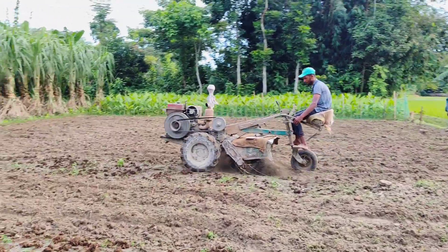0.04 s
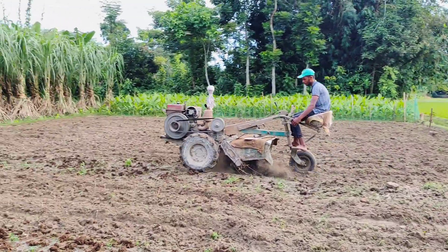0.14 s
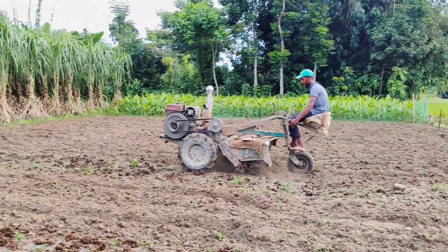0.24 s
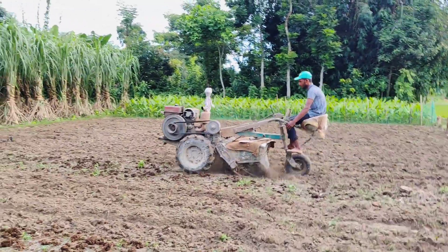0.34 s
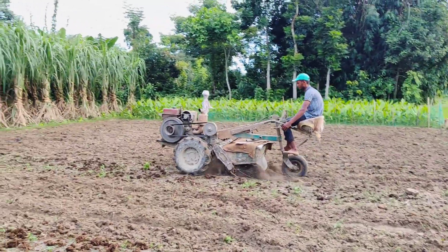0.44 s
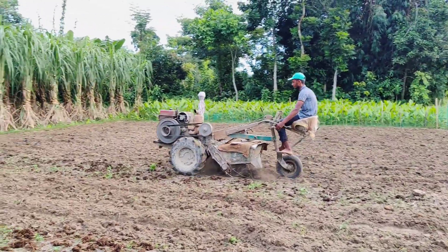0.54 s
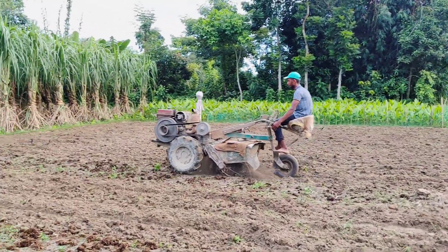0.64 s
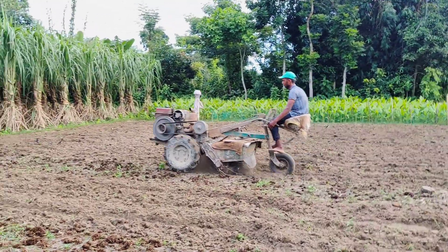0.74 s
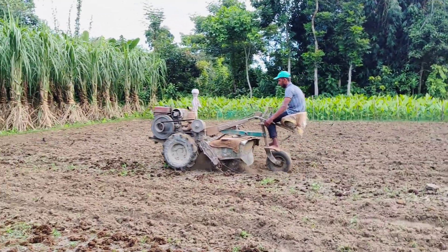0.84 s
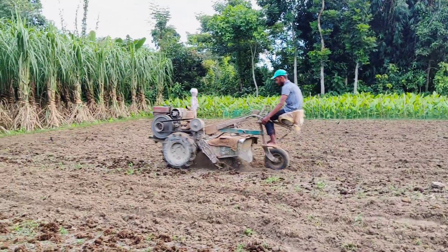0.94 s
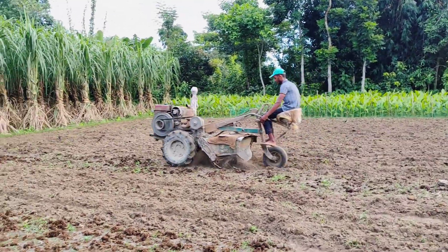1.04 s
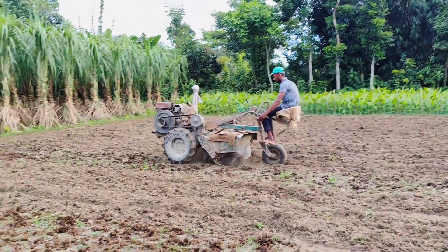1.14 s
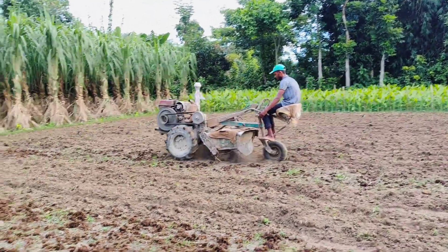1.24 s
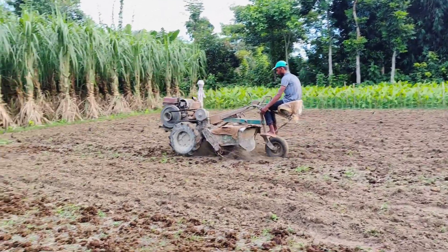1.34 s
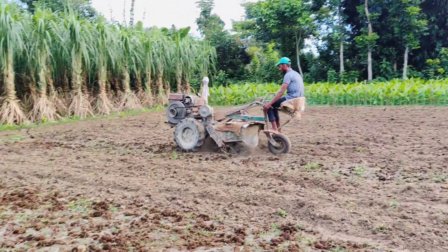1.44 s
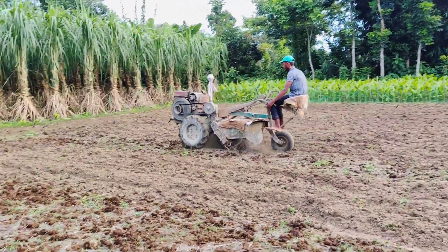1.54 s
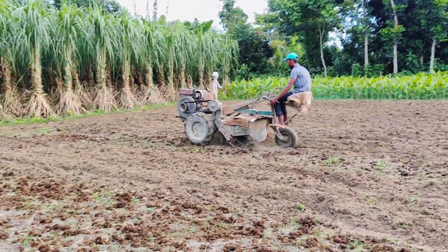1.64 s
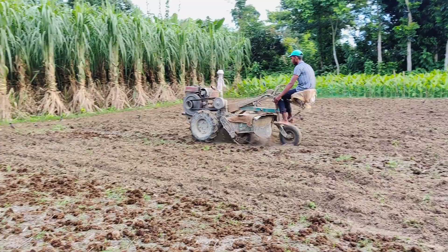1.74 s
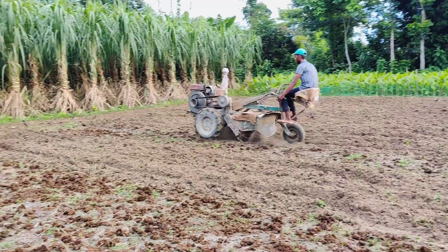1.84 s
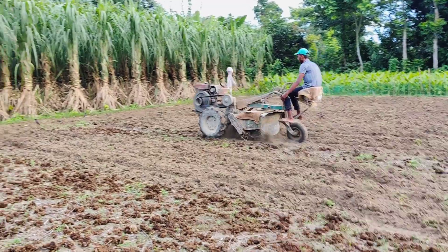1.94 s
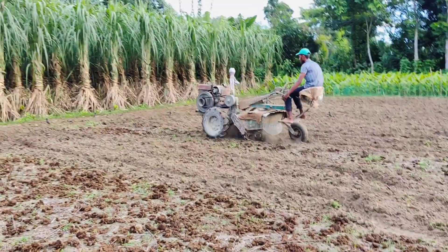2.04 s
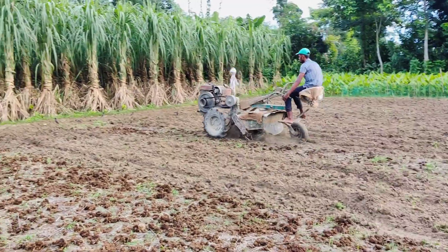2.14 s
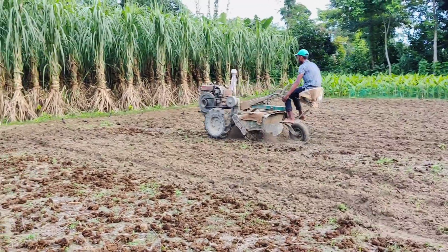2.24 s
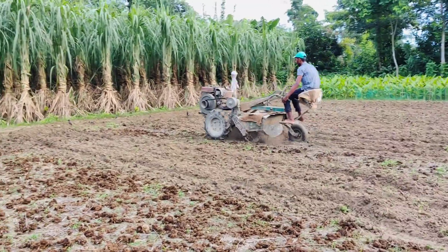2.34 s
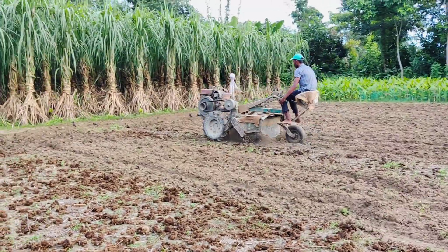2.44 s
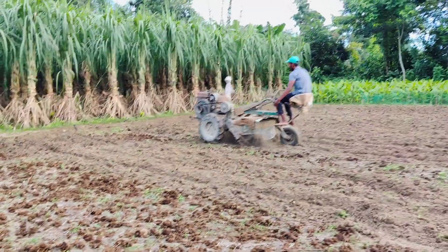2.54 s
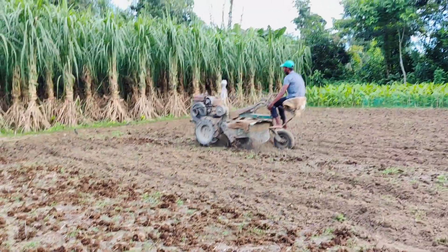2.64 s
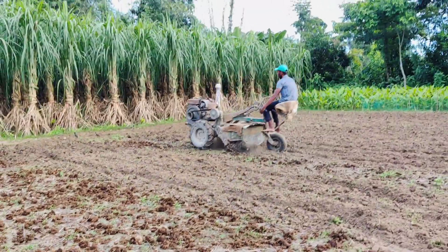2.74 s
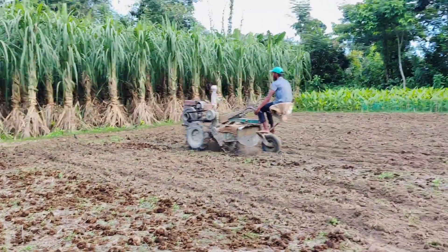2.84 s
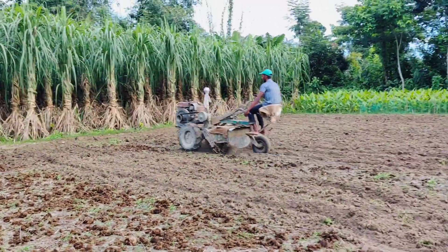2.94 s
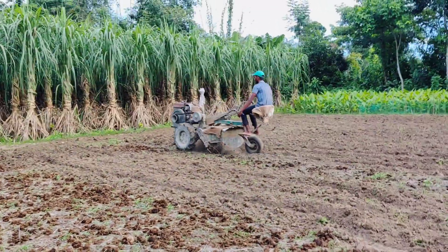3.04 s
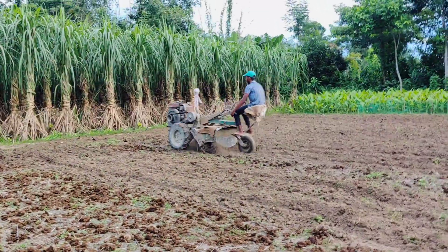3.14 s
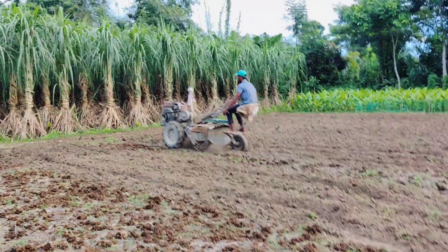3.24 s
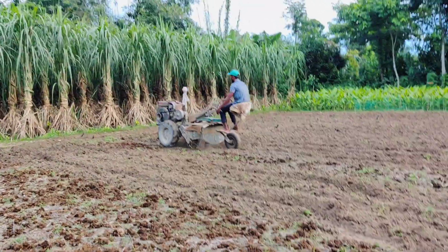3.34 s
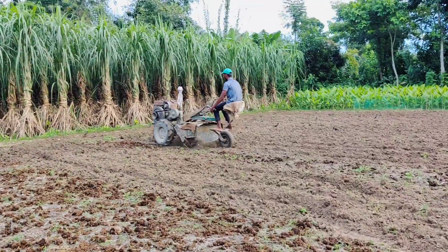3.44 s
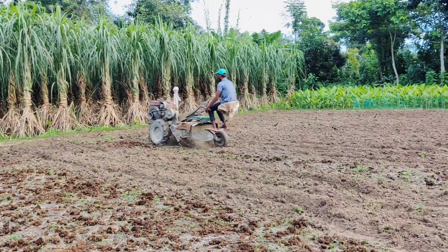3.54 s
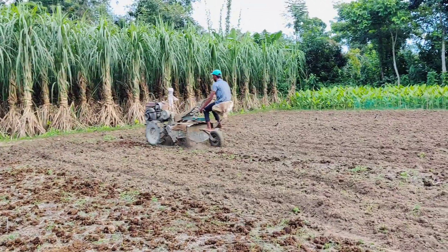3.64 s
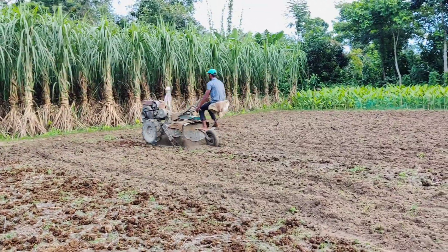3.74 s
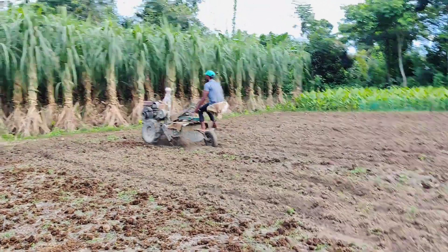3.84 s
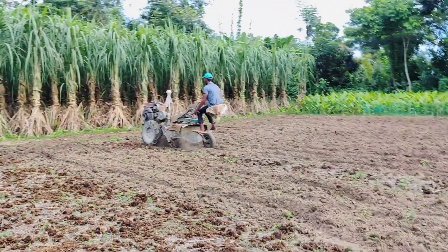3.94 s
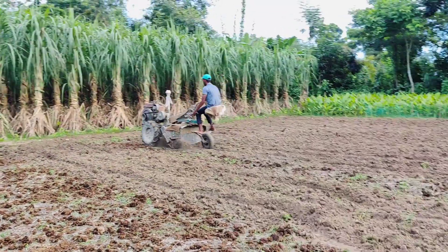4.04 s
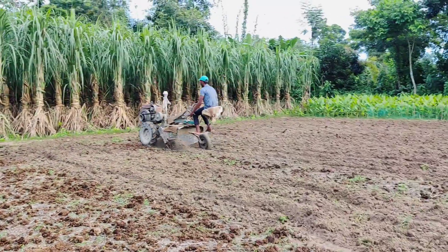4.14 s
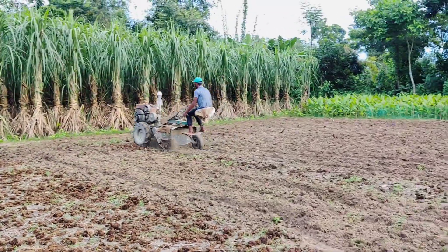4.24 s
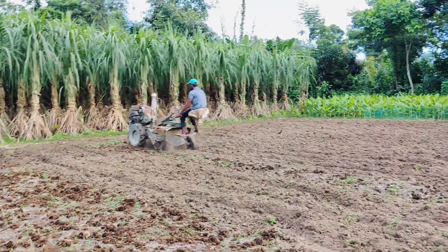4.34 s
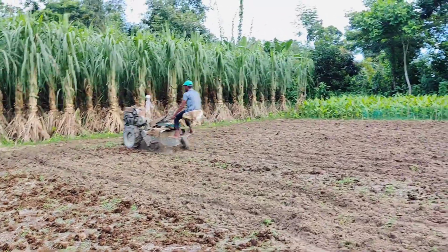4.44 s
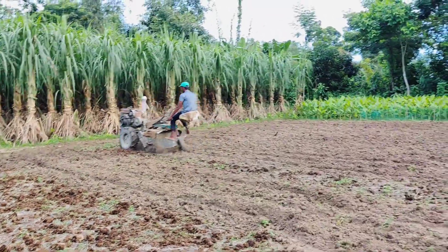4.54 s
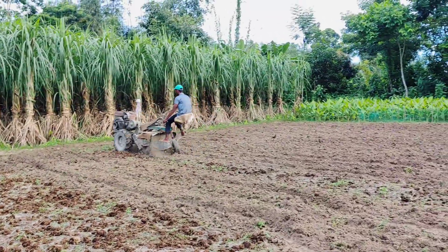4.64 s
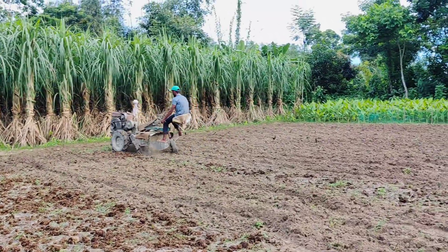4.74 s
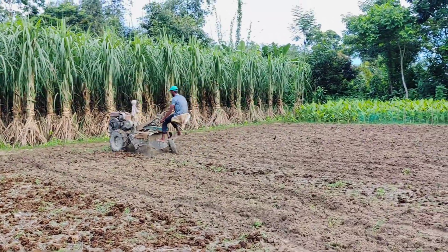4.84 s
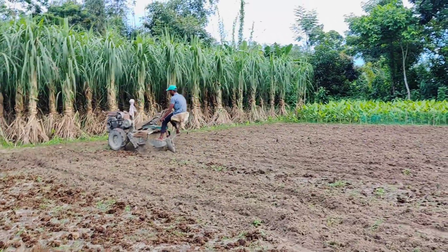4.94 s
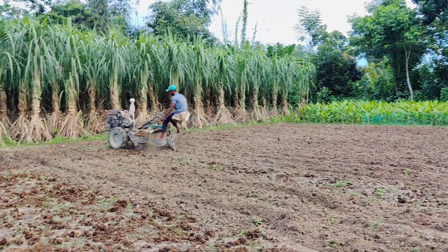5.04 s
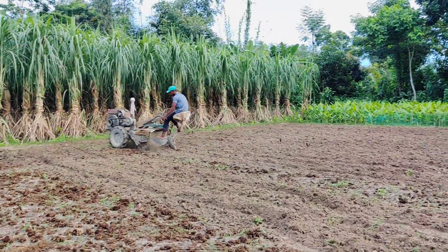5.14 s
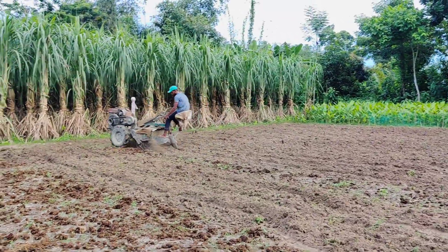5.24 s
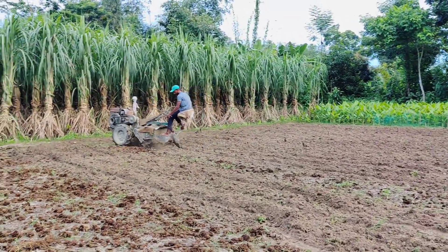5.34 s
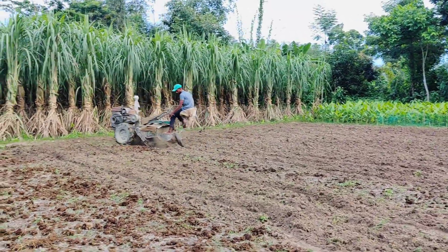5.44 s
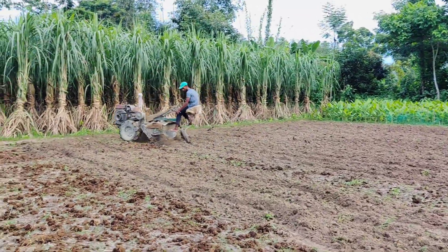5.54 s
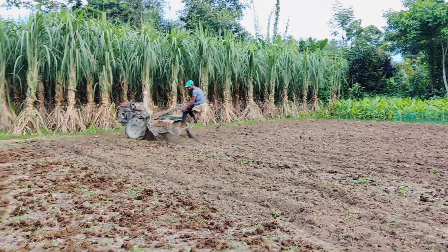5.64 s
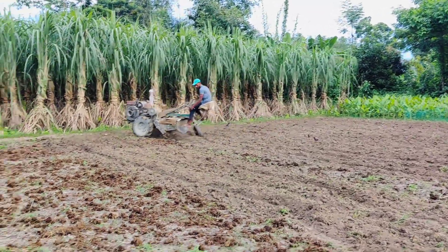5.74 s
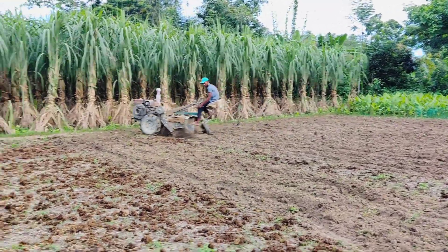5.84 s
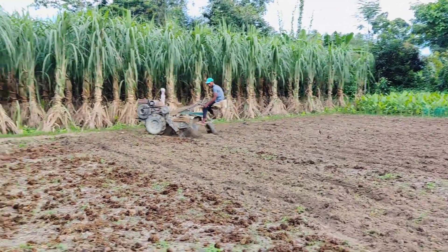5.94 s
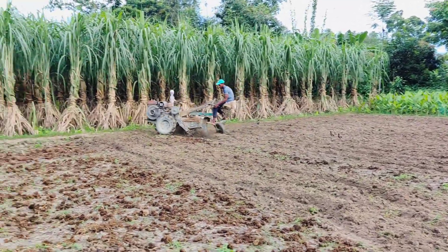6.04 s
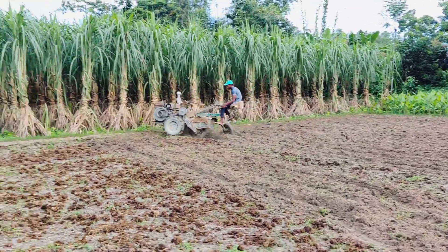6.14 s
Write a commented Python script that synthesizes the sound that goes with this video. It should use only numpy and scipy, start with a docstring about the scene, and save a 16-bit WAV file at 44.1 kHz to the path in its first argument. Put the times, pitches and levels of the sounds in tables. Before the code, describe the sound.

From the first instant a single-cylinder diesel walking tractor is already running under load about seven metres away, outdoors, heard by a handheld stereo microphone. Deep, blunt exhaust thumps come about twelve a second, each with a short gassy rush, low rumble and a cluster of metallic knocks, valve thuds and ticks. Over them runs a dense, rough rattle of gears, chain, loose panels and tiller tines, with a faint gear hum. The clatter is brightest and closest until about 1.5 s, then fades unevenly, its treble thinning as the machine draws away. Firings vary slightly in strength. Harder clanks poke out near 0.6 s, more often from 2.4 to 4.3 s, and again around 5.2 s. The engine sags a little until about 5 s, then recovers slightly before the end at 6.2 s, still running and roughly twice as far away. Close reflections shift the tone gently; there is no reverberant tail.

```python
"""A single-cylinder diesel walking tractor starts 7 m from the microphones, pulling a rotary tiller over a field.
Each four-stroke cycle gives an exhaust thump of ringing gas puffs, an intake gulp and a round of metal knocks
over gear, chain and tine rattle. As it slowly draws away the engine sags under the tines, with odd firings and
harder knocks on the way, then picks up a little at the end. The hand-held pair of microphones also hears
delayed bounces off its holder and scatter from the field."""
import sys
import numpy as np
from scipy import signal
from scipy.fft import rfft, irfft
from scipy.io import wavfile
from scipy.ndimage import uniform_filter1d, map_coordinates

SR = 44100
rng = np.random.default_rng(int(sys.argv[2]) if len(sys.argv) > 2 else 0)


def to_wav(sig):
    """Store sig (one row per channel, or 1-D mono) as 16-bit WAV at the path in sys.argv[1].

    Samples outside -1..1 are clipped; the rate is SR.
    """
    pcm = np.clip(np.atleast_2d(sig), -1, 1) * 32767
    pcm = np.round(pcm).astype(np.int16)
    wavfile.write(sys.argv[1], SR, pcm.T)  # frames by channels


N = 272979
T = np.arange(N) / SR  # [s]
FREQ = np.maximum(np.arange(N + 1) * SR / (2 * N), 1e-3)  # [Hz], for a spectrum of twice the length
START_M, AWAY_M_S = 6.96, 1.24  # distance of the tractor at first [m], and how fast it draws away [m/s]


def undb(db):
    """Decibels to gain."""
    return 10 ** (np.asarray(db) / 20)


def unit(x):
    """Scale to rms 1."""
    return x / np.sqrt(np.mean(x ** 2))


def curves(rows, at=T):
    """Join the rows of a table by straight lines over time, one curve a column."""
    s, *columns = np.transpose(rows)
    return [np.interp(at, s, column) for column in columns]


def filtered(x, response):
    """Pass a sound through a frequency response, zero-padded so that its tail does not wrap round."""
    return irfft(rfft(x, 2 * N) * response)[..., :N]


def resonance(hz, width_hz):
    """Response of one damped resonance, gain 1 at its centre."""
    return 1j * FREQ * width_hz / (hz ** 2 - FREQ ** 2 + 1j * FREQ * width_hz)


def colour(points):
    """Response through (Hz, dB) points, straight over log frequency."""
    hz, db = np.transpose(points)
    return undb(np.interp(np.log(FREQ), np.log(hz), db))


def below(hz, order):
    """Smooth low-pass response without phase shift."""
    return 1 / np.sqrt(1 + (FREQ / hz) ** (2 * order))


def delayed(x, ms):
    """Read a sound through a delay that may move, as a sound path that changes length."""
    return map_coordinates(x, [np.arange(N) - ms * SR / 1000], order=3)


def cycle_clock(turns, at_ms):
    """Index of the nearest engine cycle, and ms since a given point in it, taking the mean cycle length."""
    period_ms = 1000 * T[-1] / (turns[-1] - turns[0])
    place = turns - at_ms / period_ms
    nearest = np.round(place)
    return nearest.astype(int) + 2, (place - nearest) * period_ms  # + 2 keeps the index positive


def exhaust(turns, scatter_db=-0.2, rush_db=-18, rumble_db=-21.5, sub_db=-21.5, drone_db=-22, shake_ms=16):
    """Puffs of gas, no two alike, ring the silencer; turbulence follows each and the frame rumbles and drones."""
    # gas strokes of a cycle: (after the exhaust opens [ms], half length [ms], relative flow [out +, in -])
    strokes = [(.13, 1.21, 0.17), (21.15, 1.51, -0.084), (43.64, 1.83, 0.094), (73.04, 1.75, 0.067)]
    # firings for which the governor gives more or less fuel: (time [s], level change [dB])
    odd_firings = [(0.1, -0.9), (0.76, -1.2), (1.09, 1.8), (1.43, 1.3), (2.34, 1.3), (2.93, 1.9),
                   (3.1, 1.2), (3.68, -2.1), (4.79, 1.5), (4.96, -1.2), (5.48, -1.3), (5.73, -0.9),
                   (5.9, 1.5)]
    # silencer and air-box resonances: (centre [Hz], width [Hz], relative level [dB])
    pipe = [(56.9, 5.8, 3.5), (91.8, 18.2, -2), (108.2, 1.9, -18), (126.8, 4.8, 3), (221, 150, -5),
            (217.1, 4.3, -8.5), (252.4, 6.2, -1.5)]
    flow = 0
    for at_ms, half_ms, size in strokes:
        cycle, ms = cycle_clock(turns, at_ms)
        strength, length = rng.standard_normal((cycle.max() + 1, 2)).T
        cycle_half_ms = half_ms * (1 + 0.05 * length[cycle])
        puff = np.exp(-.5 * (ms / cycle_half_ms) ** 2)
        fuel_db = sum(db * (cycle == cycle[np.searchsorted(T, s)]) for s, db in odd_firings)
        flow = flow + size * undb(fuel_db + scatter_db * strength[cycle]) * puff
    silencer = sum(undb(db) * resonance(hz, width_hz) for hz, width_hz, db in pipe)
    thump = unit(filtered(flow, silencer * below(370, order=6)))

    _, ms = cycle_clock(turns, at_ms=5.2)
    turbulence = rng.standard_normal(N) * np.exp(-.5 * (ms / 3.8) ** 2)
    rush = filtered(turbulence, resonance(202.0, 91) * below(216, order=6))
    shake = np.exp(-.5 * (ms / shake_ms) ** 2)  # the frame shakes most just after a firing
    rumble = filtered(shake * rng.standard_normal(N), resonance(83, 47) * below(240, order=4))
    drone = filtered(rng.standard_normal(N), resonance(267.5, 28) ** 2)
    sub = filtered(shake * rng.standard_normal(N), resonance(42, 52) * below(200, order=4))
    frame = undb(rumble_db) * unit(rumble) + undb(drone_db) * unit(drone) + undb(sub_db) * unit(sub)
    return thump + undb(rush_db) * unit(rush) + frame


def distance():
    """Metres to the tractor, which draws away at a steady walking pace."""
    return START_M + AWAY_M_S * T


def machinery(turns, scatter_db=2.0, gears_db=-4, ticks_db=-10, rise_ms=1, slack_ms=0.38, ring_db=-6,
              cam_db=-17, contact_hz=7400):
    """Knocks timed by the crank, a few harder ones, and churning gears and tines all ring the same metal."""
    # in order: combustion knock, exhaust blast, exhaust valve seating (thud, then tick), intake valve thud,
    # piston slap, intake valve tick: (after the exhaust opens [ms], decay [ms], relative level [dB],
    # centre [Hz], width [Hz], clean strike over its rattle [dB])
    knocks = [(64.5, 6.8, -3.5, 2060, 3600, -16.5), (-3, 14.8, -3.5, 5200, 14200, -21),
              (21, 3.9, 1, 510, 320, 1), (23, 5.5, -1, 9200, 3000, -18), (48, 3.9, -8, 820, 750, 2.5),
              (66.5, 4.8, -8, 710, 260, -1), (47.5, 4.5, -3.5, 3700, 3500, -13)]
    # knocks harder than the rest: (time [s], decay [ms], relative level [dB], centre [Hz], width [Hz])
    hard_knocks = [(0.603, 2.7, 0.5, 1180, 1200), (1.881, 3, 2.5, 5730, 1790), (2.411, 3.5, -1, 1900, 1405),
                   (2.585, 3.5, 5, 1500, 800), (2.84, 4.4, 0.5, 775, 400), (3.262, 2.5, 2, 1300, 800),
                   (3.501, 3.7, 5, 900, 1200), (3.751, 3.3, 3, 2700, 1500), (3.842, 3.5, 5, 1510, 800),
                   (4.095, 2, 1, 2670, 1500), (4.276, 9.1, 0, 1373, 298), (5.156, 3, 5, 5900, 2600),
                   (5.203, 3.1, 1.5, 1240, 900), (5.611, 3.5, -2, 760, 400), (5.9, 3.5, 0.5, 1410, 800)]
    # ring of the engine block, gearbox and tiller hood: (frequency [Hz], relative gain [dB])
    metal = [(150, -11.5), (300, -2.5), (450.0, -10), (520.0, -8.5), (570.0, -7), (640.0, -4.5),
             (720.0, -1.15), (820.0, -1.5), (920.0, -0.7), (1020.0, -2.8), (1130.0, -0.5), (1250.0, 3),
             (1400.0, 3.5), (1580.0, 0.5), (1800.0, 1.8), (2050.0, 1.2), (2300.0, -0.4), (2600.0, -3.5),
             (2900.0, -7.5), (3300.0, -12), (3900.0, -12.5), (4600.0, -13), (5300.0, -14), (5800.0, -13.5),
             (6400.0, -12), (7000.0, -22.5), (7500, -32.5), (8900, -35), (9900, -34.5), (15000, -42)]
    chain = filtered(chain_ticks(), resonance(2700, 6800))
    drive = undb(gears_db) * rattle() + undb(ticks_db) * chain
    for at_ms, decay_ms, db, hz, width_hz, strike_db in knocks:
        cycle, ms = cycle_clock(turns, at_ms)
        strength, early = rng.standard_normal((cycle.max() + 1, 2)).T
        age_ms = np.maximum(ms + slack_ms * early[cycle], 0)
        force = undb(db + scatter_db * np.tanh(strength[cycle]))
        chatter = (1 - np.exp(-age_ms / rise_ms)) * np.exp(-age_ms / decay_ms)
        contact = np.diff(np.sign(age_ms), prepend=1) > 0  # the instant of each strike
        blow = chatter * rattle()
        blow[0] += undb(strike_db) * chatter.std() * unit(contact)
        drive = drive + 2 * filtered(force * blow, resonance(hz, width_hz) * below(contact_hz, order=4))
    cam = filtered(cam_ticks(turns), resonance(1400, 3000) * below(contact_hz, order=4))
    drive[0] += undb(cam_db) * unit(cam)
    crack = rattle()
    for s, decay_ms, db, hz, width_hz in hard_knocks:
        age_ms = 1000 * np.abs(T - s)
        burst = (T > s) * np.exp(-age_ms / decay_ms)
        ring = undb(ring_db) * np.sin(2 * np.pi * hz * (T - s))
        drive = drive + undb(db) * filtered(burst * (crack + ring), resonance(hz, width_hz))
    small_guards = loose_panels(drive, patchy_db=0.98, size=512)
    large_panels = loose_panels(small_guards, patchy_db=1.4, size=2048)
    return filtered(large_panels, colour(metal))


def rattle(grain_db=2.5):
    """Dense small impacts of unequal size, as sent three ways: towards the listener, and out to either side."""
    return unit(rng.standard_normal((3, N)) * undb(grain_db * rng.standard_normal(N)))


def cam_ticks(turns, count=17, uneven_db=4, scatter_db=1.5):
    """Worn timing gears tick at the same uneven places in every cycle."""
    places, wear = rng.random((count, 2)).T
    cycles = np.arange(np.ceil(turns[-1]))
    at = np.searchsorted(turns, cycles[:, None] + places)
    sizes = undb(uneven_db * (2 * wear - 1) + scatter_db * rng.standard_normal(at.shape))
    ticks = np.bincount(at.ravel(), sizes.ravel(), N + 1)[:N]
    return unit(ticks - ticks.mean())


def chain_ticks(per_s=350, spread_db=2.5):
    """Separate sharp ticks of chain links and of grit on the tines, at random instants."""
    falls = rng.random(N) < per_s / SR
    signs = rng.choice([-1, 1], (3, N))
    sizes = undb(spread_db * np.tanh(rng.standard_normal((3, N))))
    return unit(falls * signs * sizes)


def loose_panels(sound, patchy_db=1.5, size=512):
    """Loose panels and guards rattle at their own pitches: brief patches of the spectrum swell and dip."""
    spectra = signal.stft(sound, nperseg=size)[2]
    patches = rng.standard_normal(spectra.shape[1:])  # pitch by time, shared by the three ways
    patches = uniform_filter1d(patches, size=3, axis=0)
    patches = uniform_filter1d(patches, size=9, axis=1)
    return signal.istft(spectra * undb(patchy_db * unit(patches)), nperseg=size)[1][:, :N]


def moving_off(ports, sway_db=0.71, hood_hz=1150, block_hz=2830):
    """Hood, block and chain fade as the tractor leaves and the holder shades each port; the sizzle wavers."""
    # bottom of the clatter, mostly the tiller hood: (time [s], left level [dB], right level [dB])
    hood_levels = [(0.0, -24, -23), (0.35, -25.5, -25), (0.7, -24.5, -24.5), (1.2, -27.5, -26.5),
                   (1.6, -27, -25.5), (2.1, -28.5, -26.5), (2.5, -28.5, -29), (2.9, -30.5, -27),
                   (3.35, -29, -28.5), (3.95, -31, -30), (4.3, -33, -30), (4.7, -32.0, -27.5),
                   (5.1, -31, -34.5), (5.5, -33.5, -31), (5.85, -33.5, -32.2), (6.19, -32, -33)]
    # middle of the clatter, mostly the engine block: (time [s], left level [dB], right level [dB])
    block_levels = [(0.0, -30.1, -27.6), (0.35, -28.5, -26.5), (0.699, -29.6, -24), (1.2, -29, -25),
                    (1.6, -31.3, -26.5), (2.1, -30.4, -26.5), (2.5, -30.5, -27.9), (2.9, -32, -27.5),
                    (3.35, -31.5, -28), (3.95, -36.5, -32), (4.3, -35.5, -27.5), (4.7, -32, -26),
                    (5.1, -34, -34), (5.5, -34.5, -31), (5.85, -35.5, -31), (6.19, -32.5, -28.5)]
    # treble of the clatter, mostly chain and tines: (time [s], left level [dB], right level [dB])
    sizzle_levels = [(0.0, -28.5, -29.5), (0.35, -27.5, -27.0), (0.7, -28.5, -27.5), (1.2, -27.5, -25.3),
                     (1.6, -27.5, -28), (2.1, -30, -31), (2.5, -31.5, -33), (2.9, -33.5, -32.5),
                     (3.35, -31.5, -32), (3.95, -32, -33), (4.3, -34.5, -32.0), (4.7, -33.5, -35.5),
                     (5.1, -33, -33), (5.5, -34.5, -33.7), (5.85, -34.5, -33.5), (6.19, -31.5, -32.3)]
    hood = filtered(ports, below(hood_hz, order=8) ** 2)
    body = filtered(ports, below(block_hz, order=8) ** 2)
    block = body - hood
    sizzle = (ports - body) * undb(sway_db * wander(27.93))
    parts = (hood, hood_levels), (block, block_levels), (sizzle, sizzle_levels)
    return sum(undb(curves(levels)) * part / part.std(axis=1, keepdims=True) for part, levels in parts)


def wander(rate):
    """Smooth random drift from about `rate` fresh values a second; spread near 1."""
    size = int(SR / rate)
    steps = np.repeat(rng.standard_normal(N // size + 1), size)
    smooth = uniform_filter1d(uniform_filter1d(steps, size), size)
    return 1.3 * smooth[:N]


def body_echo(sound, ms, db, centre_hz, width_hz, small_hz):
    """A bounce off the holder: too small a surface for bass, and cloth dulls the top."""
    bounce = resonance(centre_hz, width_hz) * (1 - below(small_hz, order=2) ** 2)
    return undb(db) * delayed(filtered(sound, bounce), ms)


def field_scatter(sideways, db=0.0, small_hz=1500):
    """Clods and cane scatter the short waves back from either side."""
    return undb(db) * filtered(sideways, 1 - below(small_hz, order=2) ** 2)


def gear_hum(hz=508, width_hz=24, db=-49.0, pan_db=4.5):
    """A rough, narrow hum from the meshing gears of the tiller drive, stronger in the left port."""
    hum = unit(filtered(rng.standard_normal(N), resonance(hz, width_hz) ** 2))
    return undb(db + np.array([[pan_db], [-pan_db]]) / 2) * hum


def scene():
    """The tractor as the two microphone ports hear it: direct, off the holder, and off the field."""
    # engine speed, sagging as the tines bite and then recovering: (time [s], firing rate [1/s])
    speed = [(0, 12.105), (2.4, 11.989), (2.9, 11.878), (3.5, 11.928), (3.8, 11.727), (4.1, 11.807),
             (5, 11.649), (5.6, 11.687), (6.19, 11.94)]
    # bearing of the tractor: (time [s], treble lag of the right port [ms])
    bearing = [(0, 0.16), (2.5, 0.19), (4.5, 0.32), (5.3, 0.32), (6.19, 0.23)]
    # path by way of the holder's chest, changing as the microphone is swung:
    # (time [s], left delay [ms], left level [dB], right delay [ms], right level [dB])
    chest_path = [(0.0, 1.16, -4, 1.16, -2.2), (0.35, 1.06, -10, 1.254, 0.5), (0.7, 1.21, -5, 1.29, -0.9),
                  (1.2, 1.1, -13, 1.336, -1.5), (1.6, 1.4, -13, 1.43, -3), (2.1, 1.31, -4, 1.43, -8.5),
                  (2.5, 1.59, -7, 1.61, 1.7), (2.9, 1.61, 1.5, 1.59, -10), (3.35, 1.62, -7, 1.72, -3.5),
                  (3.95, 1.62, -1.5, 1.53, 0), (4.3, 1.583, -1, 1.675, -6), (4.7, 1.51, -4.5, 1.6, -8.5),
                  (5.1, 1.74, -12, 1.67, 1.2), (5.5, 1.88, -8.5, 1.95, -7), (5.85, 1.67, -2.5, 1.7, -4),
                  (6.19, 1.74, -23, 1.54, -1)]
    # inverted bounce, mostly later, off the edges of the holder's arms and shoulders:
    # (time [s], left delay [ms], left level [dB], right delay [ms], right level [dB])
    arms_path = [(0.0, 1.9, -13, 1.54, -22), (0.35, 2, -1, 1.15, -26), (0.7, 1.96, -11, 1.73, -12),
                 (1.2, 1.96, 2.5, 1.7, -32), (1.6, 2.07, 0, 1.46, -26), (2.1, 2.2, -5, 1.54, -21),
                 (2.5, 2.47, -6, 1.94, -12), (2.9, 2.4, -27, 2.03, -14), (3.35, 2.3, -15, 2.06, -9),
                 (3.95, 2.4, -17, 1.77, -6), (4.3, 1.6, -29, 1.98, -2), (4.7, 2.18, -20, 1.9, -7),
                 (5.1, 2.19, -9, 2.17, -1), (5.5, 2.37, -4, 2.2, -15), (5.85, 2.4, -4, 2.02, -21),
                 (6.19, 2.1, -9, 1.93, -10)]
    (firing_hz,), (lag_ms,) = curves(speed), curves(bearing)
    chest, arms = curves(chest_path), curves(arms_path)
    first_firing_s = .0180
    turns = np.cumsum(firing_hz) / SR - first_firing_s * firing_hz[0]  # engine cycles so far
    thump = exhaust(turns) * undb(-19.5) * START_M / distance()  # level falls with distance
    clatter, from_left, from_right = machinery(turns)

    left = clatter + body_echo(clatter, *chest[:2], centre_hz=1440, width_hz=26000, small_hz=400)
    left = left - body_echo(clatter, *arms[:2], centre_hz=230, width_hz=920, small_hz=400)

    # long waves bend round the microphone; the right port faces the holder and gets less direct treble
    low = filtered(clatter, below(1160, order=2) ** 2)
    right = delayed(low, 0.76 * lag_ms) + 0.4 * delayed(clatter - low, lag_ms)
    right = right + body_echo(clatter, *chest[2:], centre_hz=2850, width_hz=13200, small_hz=235)
    right = right - body_echo(clatter, *arms[2:], centre_hz=1600, width_hz=3200, small_hz=235)
    hand = body_echo(clatter, ms=0.63, db=-11.5, centre_hz=1500, width_hz=17000, small_hz=239)
    right = right - hand

    ports = np.array([left + field_scatter(from_left, db=-1), right + field_scatter(from_right, db=-1)])
    thump_ports = np.array([undb(1.07) * thump, thump])
    return moving_off(ports) + gear_hum() + thump_ports


def record(dry):
    """The recorder cuts the very top with a steep low-pass."""
    top_hz = 15300
    steep = signal.ellip(10, .1, 80, top_hz, fs=SR, output="sos")  # ripple 0.1 dB, stop band 80 dB down
    return signal.sosfilt(steep, dry)


dry = scene()
out = record(dry)
to_wav(out)
```